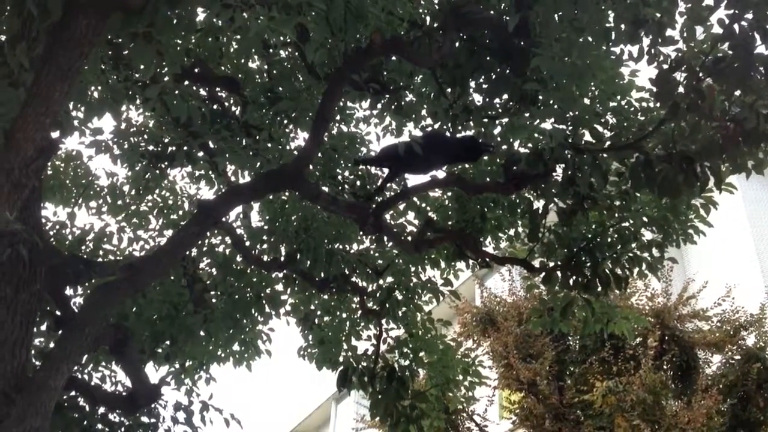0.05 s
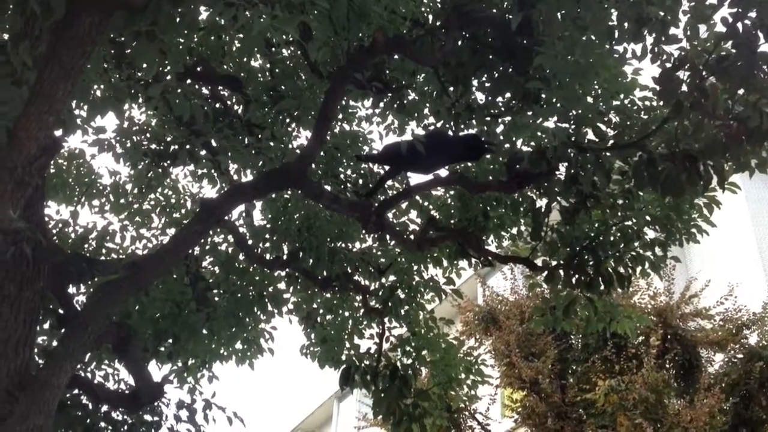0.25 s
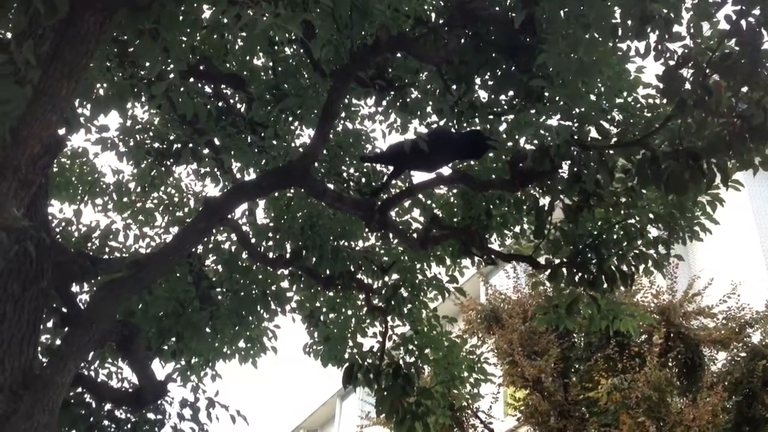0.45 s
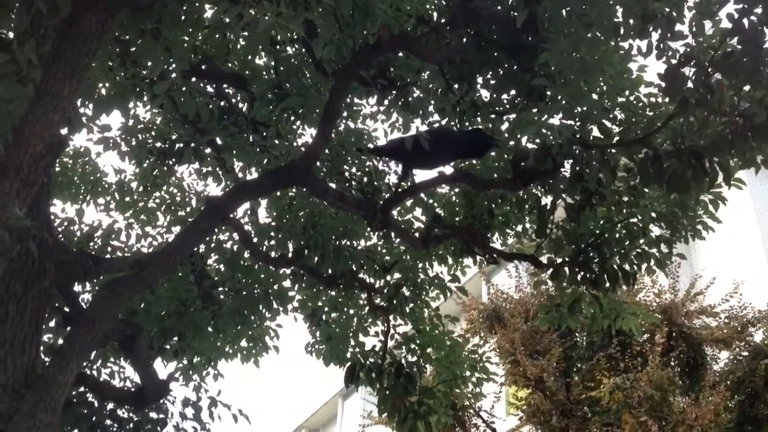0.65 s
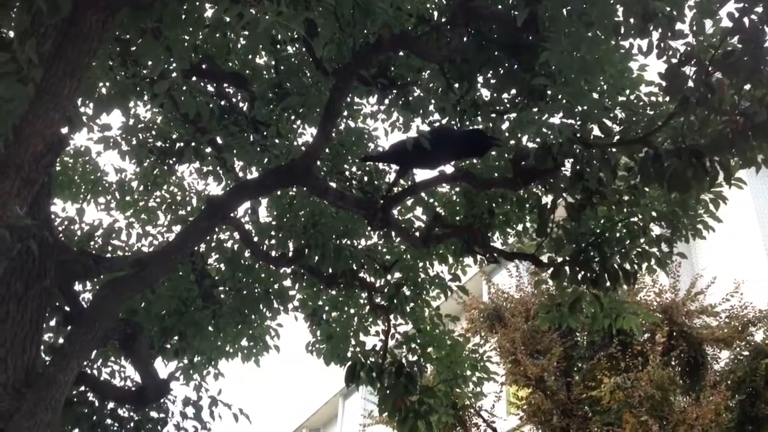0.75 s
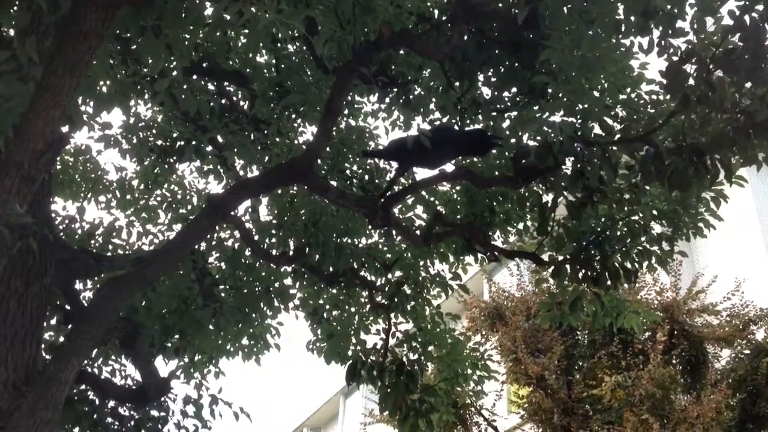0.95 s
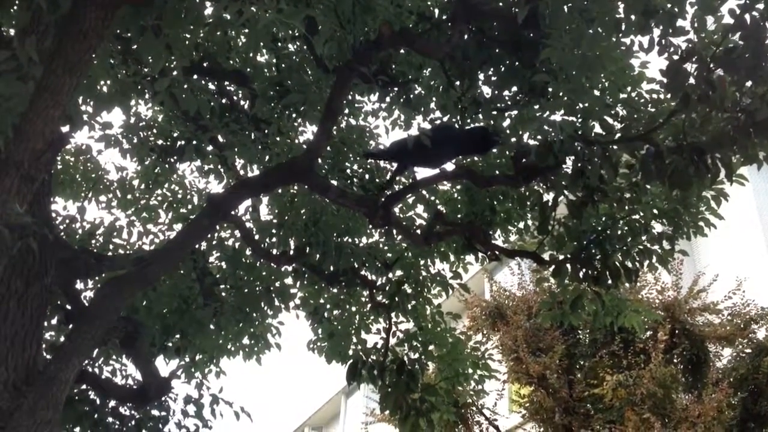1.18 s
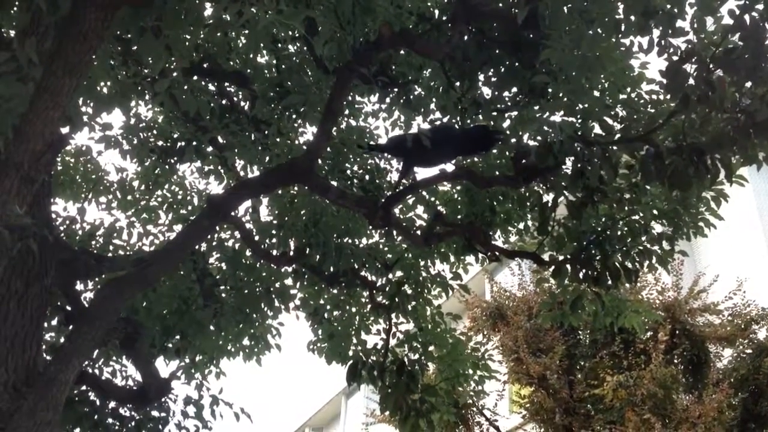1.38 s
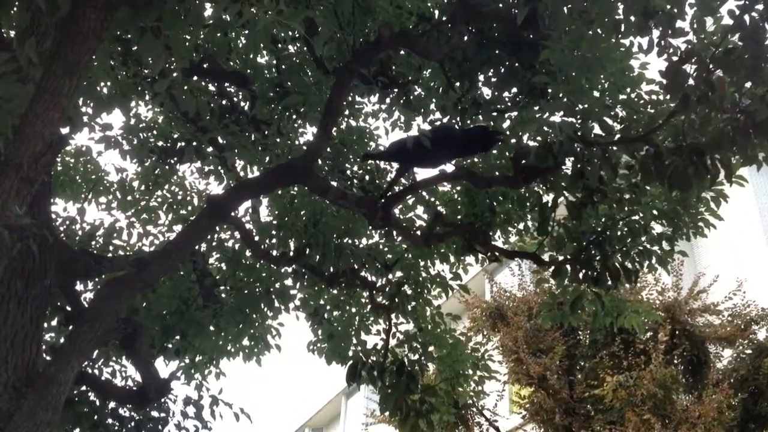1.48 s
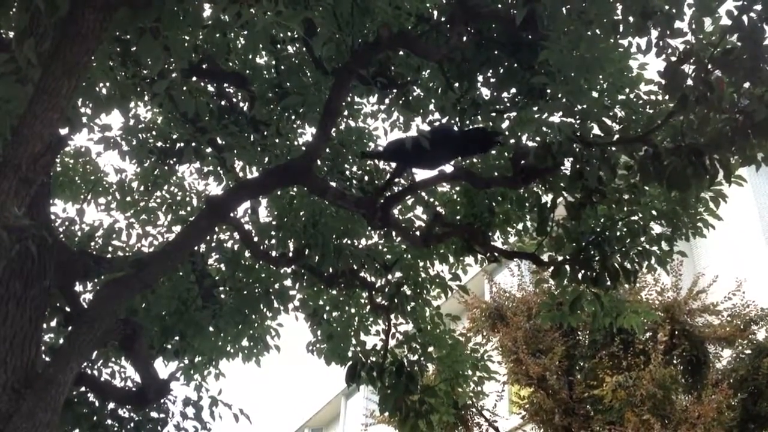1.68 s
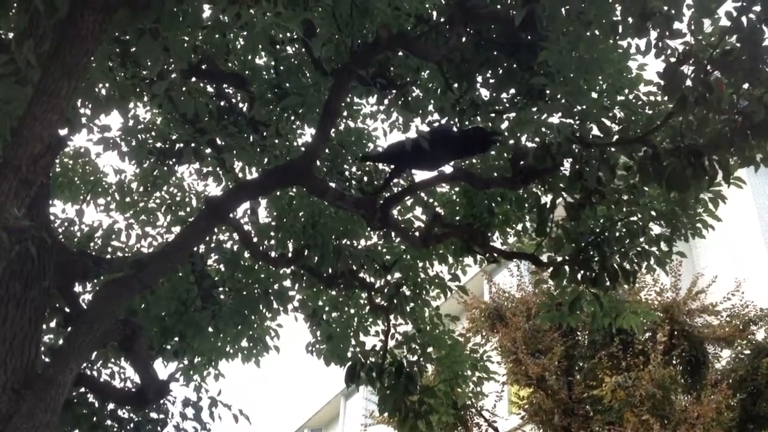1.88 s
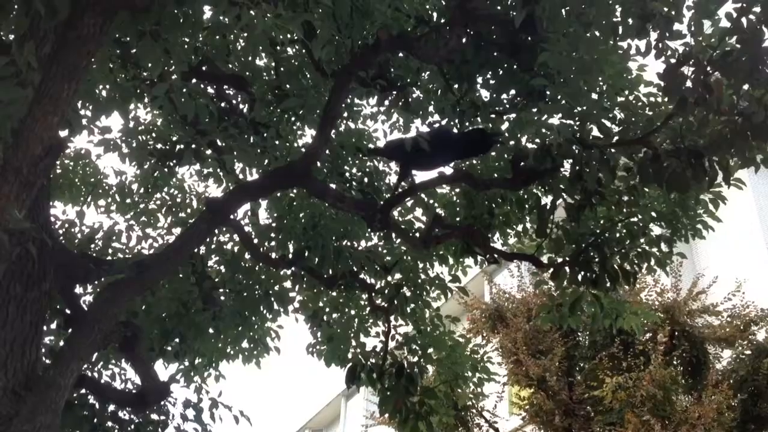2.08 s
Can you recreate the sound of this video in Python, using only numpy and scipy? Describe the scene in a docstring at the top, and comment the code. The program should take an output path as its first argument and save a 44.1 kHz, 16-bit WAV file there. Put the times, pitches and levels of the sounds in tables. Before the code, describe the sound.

A crow caws from a branch overhead. The echo of an earlier caw fades at the start, with leaves rustling softly around 0.2 s and twigs ticking near 0.3 s. Short hoarse caws, rising then falling in pitch, come at 0.54, 1.26 and 1.98 s, the last cut off by the end. Each echoes off buildings. Faint distant traffic hums throughout; small birds peep weakly, most noticeably near 1.75 s.

```python
"""Three hoarse caws from a branch overhead, between buildings that throw the calls back.
An earlier caw has just ended as we begin: only its echo is heard. Each caw is a pitch arch whose
pulses ring a narrow throat, hoarse at the top, while gated breath rings the beak.
Behind it far traffic hums as shaped noise, small birds peep as wavering tones,
and leaves and twigs stir as short filtered noise. The microphone cuts the deep bass."""
import sys
import numpy as np
from scipy import signal
from scipy.io import wavfile
from scipy.ndimage import uniform_filter1d

SR = 44100
rng = np.random.default_rng(int(sys.argv[2]) if len(sys.argv) > 2 else 0)


def gain_from_db(level_db):
    """Turn a decibel level (scalar or array-like) into a linear amplitude factor."""
    decades = np.asarray(level_db, float) / 20
    return 10 ** decades


def unload_audio(sound):
    """Save the sound as a 16-bit wav file, at the path given as the first command line argument."""
    columns = np.transpose(np.atleast_2d(sound))
    # keep every value between -1 and 1, then stretch to whole-number steps
    steps = np.round(np.clip(columns, -1, 1) * 32767)
    wavfile.write(sys.argv[1], SR, steps.astype(np.int16))


N = 94021


def evened(x):
    """Scales a signal to unit rms."""
    return x / np.sqrt(np.mean(x ** 2) + 1e-20)


def read(points, hz):
    """Looks a table up on a log-frequency axis."""
    f, value = np.transpose(points)
    return np.interp(np.log(hz + 1), np.log(f + 1), value)


def add(mix, s, sound):
    """Mixes a sound in at a time in seconds."""
    part = mix[round(s * SR):][:len(sound)]
    part += sound[:len(part)]


def resonate(x, hz, width):
    """A resonance of gain 1: shifted down to 0 Hz, smoothed, shifted back."""
    turn = np.exp(2j * np.pi * hz * np.arange(len(x)) / SR)
    r = np.exp(-np.pi * width / SR)
    smooth = signal.lfilter([1 - r], [1, -r], x / turn)
    return 2 * (turn * smooth).real


def through(x, peaks):
    """Resonances side by side, each passed twice for steeper sides."""
    return sum(gain_from_db(db) * resonate(resonate(x, hz, width), hz, width) for hz, width, db in peaks)


# Far traffic and air. Each row: frequency in Hz, relative density in dB per Hz.
HUM_SPECTRUM = [(29, -83), (50, -13.5), (248, 5), (322, -4), (372, -1), (519, -3.5), (921, -6), (1110, 2.5),
                (1200, -6.5), (1480, -9), (2070, -10.5), (2630, -13.5), (3110, -16), (3510, -14.5),
                (4050, -12), (4900, -22), (7530, -20), (13000, -36), (15000, -39)]
HUM_DB = -44.5  # rms level


def hum():
    """Far traffic and air: random short-time spectra with faint patches."""
    frames, hz = N // 256 + 5, np.fft.rfftfreq(1024, 1 / SR)
    a, b, patches = rng.standard_normal((frames, 513, 3)).T
    patches = evened(uniform_filter1d(uniform_filter1d(patches, 10, 0), 12, 1))
    patch_db = 1.45 * patches
    spectra = (a + 1j * b) * gain_from_db(read(HUM_SPECTRUM, hz)[:, None] + patch_db)
    noise = signal.istft(spectra, nperseg=1024, noverlap=768)[1][:N]
    return gain_from_db(HUM_DB) * evened(noise)


# Small birds. Each row: start in seconds, length in seconds, start pitch in Hz, end pitch in Hz,
# level in dB before wavering and fades.
BIRD_PEEPS = [(.05, .08, 4300, 4000, -62), (.28, .08, 3700, 4100, -64), (.445, .025, 3700, 3700, -62),
              (1.12, .04, 4100, 4100, -63), (1.175, .03, 4100, 4100, -63), (1.745, .09, 3690, 3640, -56),
              (1.925, .075, 3690, 3690, -60)]
PEEP_WAVER_HZ, PEEP_WAVER_DB = 25, 4.8  # rms


def peeps():
    """Gliding sines whose pitch and level waver at random."""
    out = np.zeros(N)
    for start, length, hz0, hz1, db in BIRD_PEEPS:
        noise = rng.standard_normal(SR // 4)
        u = np.arange(0, 1, 1 / (length * SR))
        pitch_waver = evened(uniform_filter1d(noise[::-1], 200))[:len(u)]
        level_waver = evened(uniform_filter1d(noise, 300))[:len(u)]
        hz = hz0 + (hz1 - hz0) * u + PEEP_WAVER_HZ * pitch_waver
        wave = np.sqrt(2) * np.sin(2 * np.pi * np.cumsum(hz) / SR)
        fade = np.sin(np.pi * u) ** 0.28
        add(out, start, gain_from_db(db + PEEP_WAVER_DB * level_waver) * fade * wave)
    return out


# Leaves. Each row: time in seconds, level in dB.
LEAF_LEVEL = [(0.131, -64), (.165, -56.5), (0.188, -57), (0.226, -55.5), (.27, -64)]


def rustle():
    """Leaves: noise of ragged level through two broad treble resonances."""
    s, db = np.transpose(LEAF_LEVEL)
    ragged_db = 8.3 * evened(uniform_filter1d(rng.standard_normal(N), 60))
    grains = rng.standard_normal(N) * gain_from_db(ragged_db)
    leaves = evened(through(grains, [(7350, 4700, 17), (11000, 5000, -14)]))
    return gain_from_db(np.interp(np.arange(N) / SR, s, db, -120, -120)) * leaves


# Twigs. Each row: time in seconds, frequency in Hz, width of one resonance pass in Hz,
# level in dB before the decay.
TWIG_TICKS = [(.27, 3000, 1505, -46.5), (.36, 3040, 1490, -45), (1.928, 7900, 5000, -48)]


def ticks():
    """Twigs: short bursts of resonant noise, quick to rise and to die."""
    out = np.zeros(N)
    t = np.arange(600) / SR
    shape = np.exp(-t / 0.0039) * np.minimum(t / 0.00058, 1)
    for s, hz, width, db in TWIG_TICKS:
        burst = evened(through(rng.standard_normal(600), [(hz, width, 0)]))
        add(out, s, gain_from_db(db) * burst * shape)
    return out


# Ground and wall echoes. Each row: delay in seconds, level in dB applied to the echo feed.
NEAR_ECHOES = [(.027, -20), (.044, -16)]
# Dying of the diffuse tail. Each row: frequency in Hz, time to fall 60 dB in seconds.
TAIL_T60 = [(300, 1.5), (1000, 0.91), (2000, 2.7), (4000, 2.1), (9000, 0.11)]
TAIL_DB = -12
WALLS_S, WALLS_SPREAD_S, WALLS_DB = .12, .06, -25  # a cluster of echoes off far walls
DIP_HZ, DIP_WIDTH_HZ, DIP = 1065, 55, .75  # in the direct sound, not in the echoes
ECHO_HZ, ECHO_WIDTH_HZ, ECHO_LIFT = 1242, 182, 0.67  # the echoes ring a little higher


def space(x):
    """Near echoes, a cluster off far walls, and a diffuse tail dying band by band."""
    taps = np.zeros(SR * 2)
    at = np.arange(900, len(taps) - 20, 20)
    taps[at + rng.integers(0, 20, len(at))] = rng.choice([-1., 1.], len(at))
    hz, t, z = signal.stft(taps, SR, nperseg=256)
    dying = gain_from_db(-60 * t / read(TAIL_T60, hz)[:, None])
    tail = signal.istft(z * dying, SR, nperseg=256)[1][:len(taps)]
    seconds = np.arange(len(taps)) / SR
    walls = taps * np.exp(-.5 * ((seconds - WALLS_S) / WALLS_SPREAD_S) ** 2)
    walls = signal.lfilter([.35], [1, -.65], walls)  # duller
    room = gain_from_db(TAIL_DB) * tail / np.linalg.norm(tail)
    room += gain_from_db(WALLS_DB) * walls / np.linalg.norm(walls)
    for delay, db in NEAR_ECHOES:
        room[round(delay * SR)] += gain_from_db(db)
    direct = x - DIP * resonate(x, DIP_HZ, DIP_WIDTH_HZ)
    echo_feed = (x + ECHO_LIFT * resonate(x, ECHO_HZ, ECHO_WIDTH_HZ)) / 2
    return direct + signal.fftconvolve(echo_feed, room)[:len(x)]


# One list per caw. Each row: time in seconds, pitch in Hz, level of the breathy treble in dB,
# voice level ahead of the throat in dB, slope above the third harmonic in dB per harmonic.
CAW_ARCHES = [
    [(0.535, 209, -62, -81, -1), (0.541, 213, -54, -31.5, -5), (0.561, 287.4, -60, -36.5, 3.5),
     (0.585, 336.6, -43.5, -16.5, -10), (0.601, 373.2, -43.5, -14, -11), (0.619, 392.7, -34.5, -15.5, 3.5),
     (0.635, 436.9, -37, -21, -0.5), (0.655, 415.9, -37, -18, -6), (0.673, 370.2, -42.5, -15, -18),
     (0.697, 338, -44.5, -16, -6), (0.713, 307.6, -46.5, -24.5, -6), (0.738, 279, -57, -36, 12)],
    [(1.26, 217.3, -65, -44, 1), (1.276, 238.8, -66, -30, -3.5), (1.292, 285.8, -72, -31.5, 0.5),
     (1.304, 319.4, -48, -24, -1.5), (1.32, 334.8, -45.5, -14, -6.5), (1.336, 368.2, -44, -16, -3),
     (1.346, 394.5, -38, -12.5, -4), (1.356, 384.9, -39.5, -19.5, 3.5), (1.386, 378.2, -43.5, -15.5, 0),
     (1.394, 384.8, -42.5, -17, -16), (1.414, 333, -48.5, -18, -5.5), (1.424, 326, -48, -16.5, -5),
     (1.446, 293.7, -48, -24, -14), (1.46, 291, -37, -34, -12)],
    [(1.975, 220.7, -66, -44, 6), (1.995, 251.4, -71, -36, 3), (2.015, 322.7, -42.5, -23, 2.5),
     (2.029, 347.6, -42.5, -15, -7.5), (2.047, 393, -40.5, -14, 1.5), (2.069, 405.8, -29.5, -19, -1),
     (2.085, 416, -34, -12, -13), (2.101, 386, -40, -15.5, 4), (2.113, 364, -39.5, -16, -7.5),
     (2.13, 360.1, -44, -9, -20)],
]
# The voice cracks at the top of each arch. Each row: middle in seconds, half length in seconds,
# hoarseness (0 to 1) added to the clear voice.
CRACKS = [(.648, .022, .45), (1.372, .02, .35), (2.097, .022, .45)]
# Throat resonances. Each row: frequency in Hz, width of one pass in Hz, gain in dB.
THROAT_PEAKS = [(420, 290, -22), (704, 67, -18.5), (1038, 225.6, 5.5), (1696, 167, -7), (2040, 190, -35.5)]
# Beak resonances. Each row: frequency in Hz, width of one pass in Hz, relative gain in dB.
BEAK_PEAKS = [(2844, 1030, 3), (3550, 830, 1.5), (4060, 1000, 8), (6120, 5100, -5.5), (8200, 2100, -22),
              (11300, 10000, -28)]
CLEAR = .08  # hoarseness of the clear voice
RASP_LINES = .22  # amplitude of each high harmonic in the breath
FLUTTER_DB = 3.5  # rms: each harmonic wavers on its own
EDGE_S = .01


def caw(rows):
    """Pulses on the pitch arch ring the throat; breath, gated each cycle, rings the beak."""
    s, *columns = np.transpose(rows)
    t = np.arange(s[0], s[-1], 1 / SR)
    hz, breath_db, voice_db, slope_db = (np.interp(t, s, column) for column in columns)
    hoarse = CLEAR + sum(much * np.exp(-.5 * ((t - mid) / spread) ** 4) for mid, spread, much in CRACKS)
    wander, rough, breath = rng.standard_normal((3, SR // 2))[:, :len(t)]
    jitter = 0.0856 * hoarse * evened(uniform_filter1d(wander, 120))
    turns = np.cumsum(hz * (1 + jitter)) / SR  # cycles of the voice
    gate = 0.12 + np.exp(-(turns % 1) / 0.78)

    def harmonic(k):
        return np.cos(2 * np.pi * k * turns)

    flutter = uniform_filter1d(uniform_filter1d(rng.standard_normal((7, SR // 2)), 300), 200)
    flutter_db = FLUTTER_DB * evened(flutter)[:, :len(t)]
    flutter_db[2] /= 3  # the ringing third harmonic is the steadiest
    pulses = np.zeros(len(t))
    for k in range(1, 8):
        fall_db = slope_db * max(k - 3, 0) - 9 * max(k - 4, 0)  # steeper above the fourth
        pulses += gain_from_db(fall_db + flutter_db[k - 1]) * harmonic(k)
    drive = pulses * (1 - hoarse) + 3 * hoarse * evened(gate * rough)

    to_end = s[-1] - t + (s[-1] > 2.1)  # the last caw runs to the end without a fade
    edge = np.clip(np.minimum(t - s[0], to_end) / EDGE_S, 0, 1)
    ring_out = np.zeros(800)
    voice = through(np.r_[edge * gain_from_db(voice_db) * drive, ring_out], THROAT_PEAKS)
    rasp = RASP_LINES * sum(harmonic(k) for k in range(6, 24))
    treble = evened(through(gate * breath + rasp, BEAK_PEAKS)) * gain_from_db(breath_db) * edge
    return voice + np.r_[treble, ring_out]


PRE_S = .3  # time kept ahead of the start, for the earlier caw
EARLIER_S, EARLIER_DB = -.8, 1.5  # shift and gain from the first caw


def scene():
    """The crow overhead in its space, over far hum, birds, leaves and twigs."""
    crow = np.zeros(N + round(PRE_S * SR))
    first_s = CAW_ARCHES[0][0][0]
    add(crow, PRE_S + first_s + EARLIER_S, gain_from_db(EARLIER_DB) * caw(CAW_ARCHES[0]))
    for rows in CAW_ARCHES:
        add(crow, PRE_S + rows[0][0], caw(rows))
    background = hum() + peeps() + rustle() + ticks()
    return (space(crow)[-N:] + background)[None]


def top_cut(x):
    """Nothing passes above the cut-off."""
    return signal.sosfilt(signal.butter(12, 15190, fs=SR, output="sos"), x)


def record(dry):
    """The microphone cuts the deep bass below 65 Hz."""
    bass_cut = signal.butter(3, 65, "high", fs=SR, output="sos")
    mix = signal.sosfilt(bass_cut, dry)
    return top_cut(mix)


dry = scene()
out = record(dry)
unload_audio(out)
```